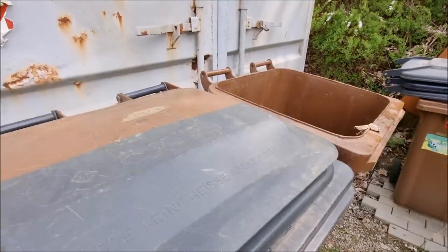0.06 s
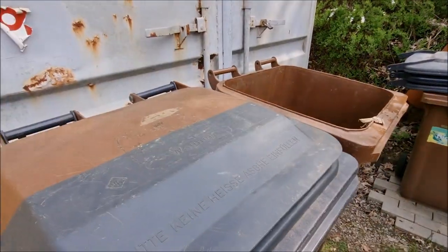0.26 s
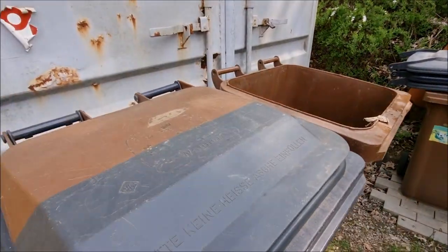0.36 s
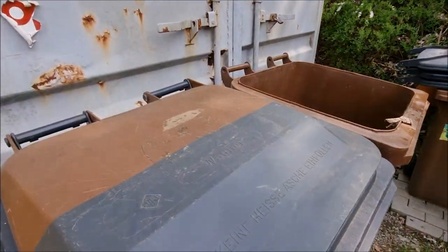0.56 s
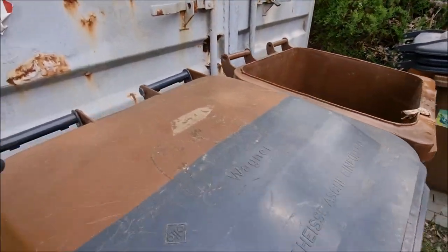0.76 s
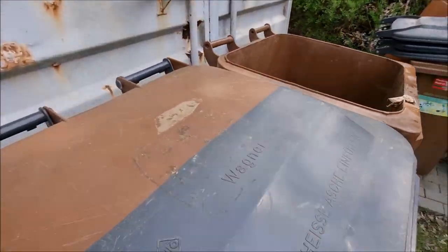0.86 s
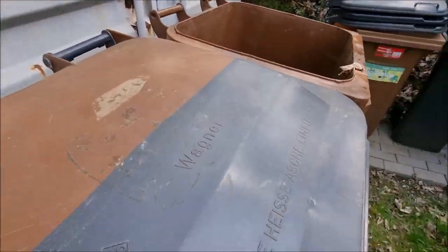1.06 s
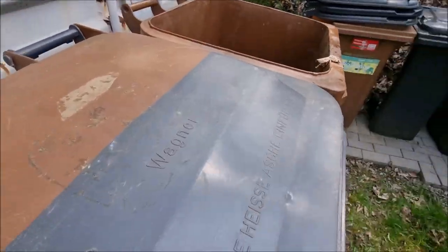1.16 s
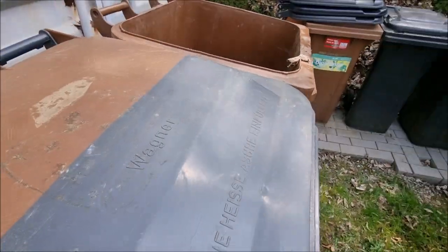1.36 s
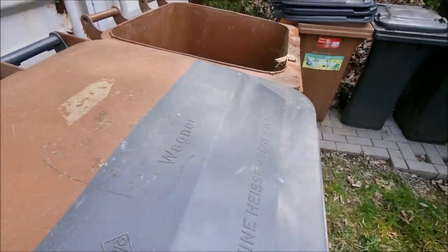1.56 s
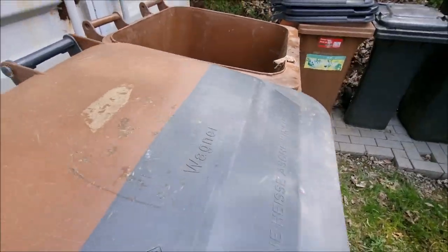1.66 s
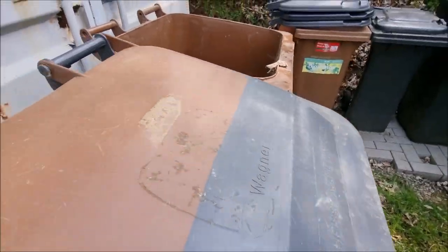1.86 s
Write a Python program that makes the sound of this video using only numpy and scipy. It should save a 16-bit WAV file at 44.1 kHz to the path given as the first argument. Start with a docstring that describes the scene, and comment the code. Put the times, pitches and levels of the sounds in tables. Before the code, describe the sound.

Outdoors, the lid of a plastic bin slams down with a hollow thud and settles with two softer knocks. Faint cloth rustling, far-off birdsong and a light bump follow, over quiet air and slight wind on the microphone.

```python
"""Faint outdoor air and a low rumble of wind on the microphone run throughout.
At 0.2 s a plastic wheelie-bin lid drops shut: the rim cracks down, the lid bounces, the hollow bin booms.
It settles with two softer knocks by 0.6 s. From 1 s a sleeve rustles, then a far-off bird whistles.
Near 1.6 s the bin is bumped lightly."""
import sys
import numpy as np
from scipy import signal
from scipy.fft import rfft, irfft
from scipy.io import wavfile
from scipy.ndimage import uniform_filter1d

SR = 44100
rng = np.random.default_rng(int(sys.argv[2]) if len(sys.argv) > 2 else 0)


def inscribe(sig):
    """Save sig as 16-bit PCM at rate SR to the path in sys.argv[1].

    A 1-D sig is mono; a 2-D sig holds one channel per row.
    Samples are clipped to [-1, 1] before scaling.
    """
    pcm = np.round(np.clip(np.atleast_2d(sig).T, -1, 1) * 32767)
    wavfile.write(sys.argv[1], SR, pcm.astype(np.int16))


N = 83790
RING_SAMPLES = 32768

# Blows on the bin: start_s, thump_hz, thump_db, thump_t60_s, body_db, clack_db, clack_hz, crack_db, left_db
BLOWS = [(0.2124, 130, -33.5, 0.099, -37, -41.5, 790, -37, 1.5),
         (0.2156, 55, -39, 0.43, -46, -41, 780, -39, -12),
         (0.2244, 140, -53, 0.073, -42, -40.5, 810, -62, 9.5),
         (0.2453, 61, -32.5, 0.22, -41, -46, 1200, -74, -13),
         (0.274, 101.2, -28, 0.095, -37, -53.5, 1000, -78, -12),
         (0.2872, 98.2, -24, 0.15, -43, -41.5, 1170, -49.5, -3.5),
         (0.2965, 93, -29.5, 0.06, -38.5, -43, 1070, -72, 3),
         (0.32, 119.6, -40, 0.35, -41, -46.5, 1100, -65, -2.5),
         (0.344, 66, -34.5, 0.3, -49, -48, 1080, -86, -3),
         (0.377, 66, -34.5, 0.27, -46.5, -79, 890, -81, -12),
         (0.488, 88.7, -35.5, 0.36, -48.5, -56, 734, -79, 1),
         (0.557, 77.3, -41, 0.18, -46, -52, 1280, -74, -12),
         (0.5707, 88.7, -40, 0.84, -51.5, -69, 700, -82, -8),
         (0.5714, 67, -27.5, 0.089, -56, -80, 700, -88, -3), (1.535, 72, -54, 0.26, -60, -64, 547, -80, -2),
         (1.590, 423, -37.5, 0.029, -51.5, -71.5, 605, -86, 23),
         (1.6116, 76, -43.5, 0.22, -46, -56.5, 1150, -59, -5),
         (1.662, 114, -43.5, 0.085, -51, -74, 700, -78, -4)]
# Dense ring of the plastic: freq_hz, density_db
SHELL_SPECTRUM = [(60, -6.5), (200, 4.5), (430, -2), (600, -8.5), (800, -3), (1270, -2), (1550, -6),
                  (2150, -2.5), (3500, -10.5), (6500, -13), (8200, -25.5), (16000, -27.5)]
# Left-over-right balance of the air: freq_hz, left_db
AIR_BALANCE = [(100, 4.5), (1000, -2), (4500, -6.5), (9000, -0.5)]


def amp(db):
    """Decibels to gain."""
    return 10 ** (np.asarray(db) / 20)


def unit(x):
    """Scale to rms 1."""
    return x / np.sqrt(np.mean(x ** 2) + 1e-20)


def decay(t, t60_s):
    """Exponential fall, 60 dB per t60_s."""
    return np.exp(-np.log(1000) * t / t60_s)


def rise(t, tau_s):
    """Exponential approach to 1."""
    return 1 - np.exp(-t / tau_s)


def read(points, hz):
    """Interpolate a table over log frequency."""
    freq_hz, value = np.transpose(points)
    return np.interp(np.log(hz + 1), np.log(freq_hz + 1), value)


def pan(left_db):
    """Left and right gains for a level difference."""
    return amp(np.array([[.5], [-.5]]) * left_db)


def add(mix, start_s, sound):
    """Mix in a stereo sound."""
    part = mix[:, round(start_s * SR):][:, :sound.shape[1]]
    part += sound[:, :part.shape[1]]


def noise(spectrum, size):
    """Coloured stereo noise at rms 1, partly correlated in the bass."""
    coherence = [(60, 0.41), (180, 0.63), (350, 0.62), (700, -0.22), (2000, 0.049), (12000, -0.12)]  # left-right likeness: freq_hz, correlation
    hz = np.fft.rfftfreq(size, 1 / SR)
    left, other = np.exp(2j * np.pi * rng.random((2, len(hz))))
    same = np.clip(read(coherence, hz), -1, 1)
    right = same * left + np.sqrt(1 - same ** 2) * other
    return unit(irfft(np.array([left, right]) * amp(read(spectrum, hz)), size))


def colour(x, gain):
    """Filter by gain(hz)."""
    return irfft(rfft(x) * gain(np.fft.rfftfreq(x.shape[1], 1 / SR)), x.shape[1])


def band_decay(x, bands):
    """Each band dies at its own rate."""
    t = np.arange(x.shape[1]) / SR
    centres_hz, t60s = zip(*bands)
    return sum(colour(x, lambda hz: read(list(zip(centres_hz, share)), hz)) * decay(t, t60_s)
               for share, t60_s in zip(np.eye(len(bands)), t60s))


def swelling(peaks):
    """Envelope of Gaussian swells."""
    t = np.arange(N) / SR
    return sum(amp(db) * np.exp(-.5 * ((t - peak_s) / sigma_s) ** 2) for peak_s, sigma_s, db in peaks)


def air():
    """Distant outdoor hush, drifting in small time-frequency patches."""
    spectrum = [(20, -28), (60, 13.5), (110, 11), (160, -1), (330, -1.5), (600, -3.5), (1100, -4.5),
                (2000, -2), (2600, -5), (3800, -5), (4700, -13), (7000, -13), (8300, -26), (11000, -26),
                (13500, -21), (16000, -23.5)]  # freq_hz, density_db
    level_db, patch_db = -61, 2
    hz, _, bins = signal.stft(noise(spectrum, N), SR, nperseg=512)
    patches = uniform_filter1d(rng.standard_normal(bins.shape[1:]), size=7, axis=0)
    patches = unit(uniform_filter1d(patches, size=16, axis=1))
    bins = bins * amp(patch_db * patches) * pan(read(AIR_BALANCE, hz))[:, :, None]
    return amp(level_db) * signal.istft(bins, SR, nperseg=512)[1][:, :N]


def hiss():
    """The upper part of the hush swells softly."""
    spectrum = [(1450, -12), (1900, 2.5), (2150, -2.5), (2600, -18), (3500, -10.5), (4150, -7), (4500, -13),
                (7000, -14), (8300, -29.5)]  # freq_hz, density_db
    swells = [(0.02, 0.024, -58.5), (0.62, 0.17, -60.5)]  # peak_s, sigma_s, level_db
    return swelling(swells) * colour(noise(spectrum, N), lambda hz: pan(read(AIR_BALANCE, hz)))


def wind():
    """Low, uneven rumble on the moving microphone."""
    spectrum = [(15, -37), (32, 0), (62, 2.5), (100, -7), (160, -22.5), (350, -16.5), (900, -56)]  # freq_hz, density_db
    gusts = [(0, -57.5), (.08, -52.5), (.16, -63), (.45, -50.5), (.70, -53.5), (.84, -70), (1.05, -67.5),
             (1.5, -62), (1.699, -47), (1.75, -65.5), (1.82, -55.5), (1.9, -61.5)]  # time_s, level_db
    return noise(spectrum, N) * amp(np.interp(np.arange(N) / SR, *np.transpose(gusts)))


def bird(mix):
    """Add thin, twittering whistles, blurred by distance."""
    notes = [(1.259, 0.063, 4850, -68), (1.358, 0.16, 4050, -65.5), (1.437, .17, 3335, -63),
             (1.76, 0.14, 3160, -64)]  # start_s, length_s, pitch_hz, level_db
    waver_share, fall_share = 0.04, 0.0074
    for start_s, length_s, pitch_hz, level_db in notes:
        progress = np.linspace(0, 1, round(length_s * SR))
        waver = unit(uniform_filter1d(rng.standard_normal((2, len(progress))), size=120))
        hz = pitch_hz * (1 + waver_share * waver - fall_share * (progress - .5))
        cycles = np.cumsum(hz, axis=1) / SR
        add(mix, start_s, amp(level_db) * np.sin(np.pi * progress) * np.sin(2 * np.pi * cycles))


def sleeve():
    """Cloth slides in short, grainy strokes."""
    spectrum = [(200, -5), (1000, -10), (3500, -2.5), (7000, -9), (8300, -17.5), (11000, -18.5),
                (12500, -12.5), (16000, -16.5)]  # freq_hz, density_db
    strokes = [(0.99, 0.023, -56.5), (1.073, 0.017, -64.5), (1.114, 0.014, -61), (1.162, 0.018, -62.5),
               (1.626, 0.053, -64.5), (1.836, 0.055, -66)]  # peak_s, sigma_s, level_db
    grain_db = 2 * unit(uniform_filter1d(rng.standard_normal(N), size=120))
    return swelling(strokes) * unit(noise(spectrum, N) * amp(grain_db))


def hinge(mix):
    """Add tiny, bright ticks of plastic on plastic."""
    ticks = [(0.320, -51.5, 3100), (0.382, -72, 8800), (1.613, -67, 8900)]  # start_s, level_db, pitch_hz
    t = np.arange(RING_SAMPLES) / SR
    width_share = .18
    for start_s, level_db, pitch_hz in ticks:
        white = rng.standard_normal((2, RING_SAMPLES))
        ring = colour(white, lambda hz: 1 / (1 + ((hz / pitch_hz - 1) / width_share) ** 2))
        add(mix, start_s, amp(level_db) * unit(ring) * decay(t, t60_s=0.034))


def rim_damping(start_s, age_s):
    """Extra decay of later blows, once the lid lies low on the rim."""
    return decay(age_s, t60_s=0.38) if start_s > .45 else 1


def boom():
    """Every blow feeds the lid's hollow note; the flexed lid rings sharp, then relaxes."""
    relaxed_hz, sharp_share, relax_s, gain_db = 188, 0.15, 0.04, 3.5
    t = np.arange(N) / SR
    energy = np.zeros(N)
    for start_s, _, _, _, body_db, *_ in BLOWS:
        age_s = np.maximum(t - start_s, 0)
        envelope = rise(age_s, tau_s=0.0066) * decay(age_s, t60_s=.28) * rim_damping(start_s, age_s)
        energy += (amp(body_db) * envelope) ** 2
    since_drop_s = np.maximum(t - BLOWS[0][0], 0)
    hz = relaxed_hz * (1 + sharp_share * np.exp(-since_drop_s / relax_s))
    return amp(gain_db) * np.sqrt(energy) * np.sin(2 * np.pi * np.cumsum(hz) / SR)


def thump(start_s, pitch_hz, level_db, t60_s):
    """Hollow low note of one blow, damped as the lid comes to rest."""
    settle_s, left_lead_s = 0.69, .0001
    t = np.arange(RING_SAMPLES) / SR
    settled_s = (start_s < settle_s) * np.maximum(start_s + t - settle_s, 0)
    envelope = rise(t, tau_s=0.0017) * decay(t, t60_s) * decay(settled_s, t60_s=0.14)
    tone = np.sin(2 * np.pi * pitch_hz * (t + np.array([[left_lead_s], [0]])))
    return amp(level_db) * envelope * tone


def clack(shell, start_s, body_db, clack_db, clack_hz, crack_db, left_db):
    """The lid strikes the rim: the walls ring, the yard answers."""
    modes = [(268.6, -8, 0.16), (351.3, -11, 0.25), (395, -0.5, 0.11), (498.8, -6, 0.17),
             (712.7, -13.5, 0.28), (830, -7, 0.1), (973.4, -14, 0.095), (1021, -25, 0.31),
             (1144, -11.5, 0.15), (1782, 0.5, 0.083), (2334, -2, 0.053), (2730, -1, 0.046)]  # lid and bin: freq_hz, gain_db, t60_s
    shell_decay = [(150, 0.2), (500, 0.14), (1100, 0.16), (2200, 0.061), (6000, 0.026), (14000, 0.021)]  # freq_hz, t60_s
    yard_decay = [(150, 0.43), (1000, 0.41), (3000, 0.29), (12000, 0.087)]  # freq_hz, t60_s
    balance = [(150, 4), (400, 3.5), (1200, 6), (1900, 6), (4500, -0.5), (9000, 4.5)]  # freq_hz, left_db
    body_hz, mid_hz, crack_hz, treble_hz = 364, 990, 2110, 6000
    peak_db, peak_octaves, shell_db, yard_db = 4.5, 0.44, 3, -10
    t = np.arange(RING_SAMPLES) / SR
    # Blows gentler than the first crack make longer contact and lose treble.
    gentle_db = max(BLOWS[0][7] - crack_db, 0)
    contact = rise(t, tau_s=0.00011 * amp(0.083 * gentle_db))
    treble_db = crack_db - 0.86 * gentle_db
    force = [(body_hz, body_db), (mid_hz, clack_db), (crack_hz, crack_db), (treble_hz, treble_db)]

    def drive(hz):
        """Stereo gain; each contact point favours its own band."""
        favoured_db = peak_db * np.exp(-(np.log2((hz + 1) / clack_hz) / peak_octaves) ** 2)
        side_db = read(balance, hz) + left_db * np.minimum(hz / mid_hz, 1)
        return amp(read(force, hz) + favoured_db) * pan(side_db)

    walls = amp(shell_db) * band_decay(colour(shell, drive), shell_decay)
    for k, (hz, gain_db, t60_s) in enumerate(modes):
        spread_rad = 0.61 * min(hz / mid_hz, 1) * (-1) ** k * np.array([[1], [-1]])
        envelope = rise(t, tau_s=0.0033 * body_hz / hz) * decay(t, t60_s)
        walls += amp(gain_db) * drive(hz) * envelope * np.sin(2 * np.pi * hz * t + spread_rad)
    reflections = colour(noise(SHELL_SPECTRUM, RING_SAMPLES), drive)
    yard = amp(yard_db) * band_decay(reflections, yard_decay) * rise(t, tau_s=0.0052)
    return contact * (rim_damping(start_s, t) * walls + yard)


def scene():
    """Open air, sleeve, bin and a far bird."""
    mix = air() + hiss() + wind() + sleeve() + boom()
    shell = noise(SHELL_SPECTRUM, RING_SAMPLES)  # same plastic for every blow
    for start_s, thump_hz, thump_db, thump_t60_s, *strike in BLOWS:
        add(mix, start_s, thump(start_s, thump_hz, thump_db, thump_t60_s))
        add(mix, start_s, clack(shell, start_s, *strike))
    hinge(mix)
    bird(mix)
    return mix


def record(dry):
    """Microphone low cut, then a steep band limit."""
    low_cut_hz, high_cut_hz = 24.4, 15850
    trimmed = colour(dry, lambda hz: hz ** 2 / np.sqrt(hz ** 4 + low_cut_hz ** 4))
    lowpass = signal.firwin(511, high_cut_hz, window=("kaiser", 9), fs=SR)
    return signal.oaconvolve(trimmed, lowpass[None], "same")


dry = scene()
out = record(dry)
inscribe(out)
```